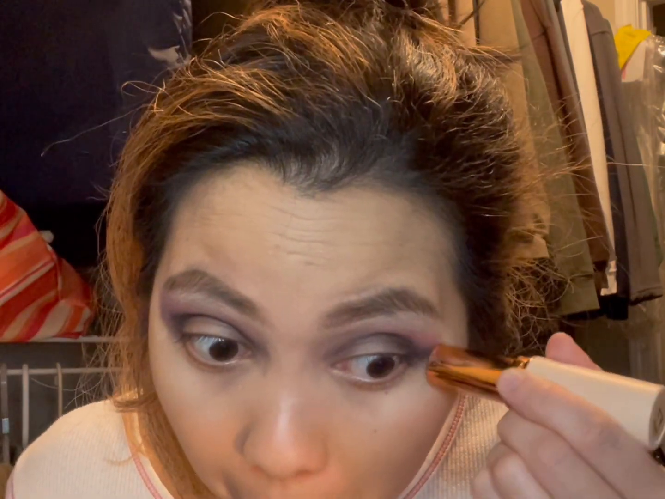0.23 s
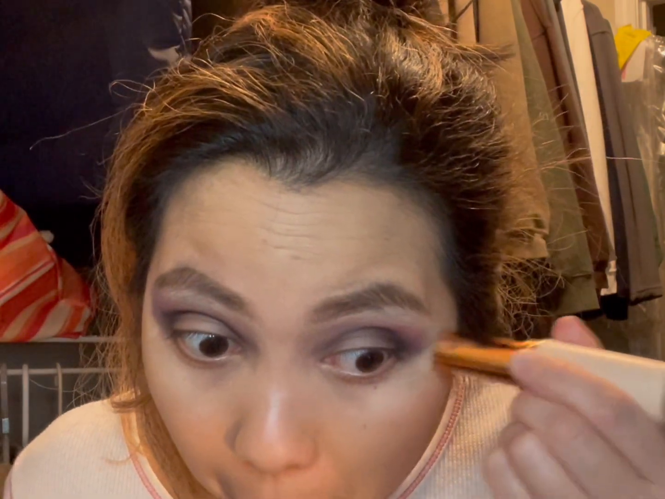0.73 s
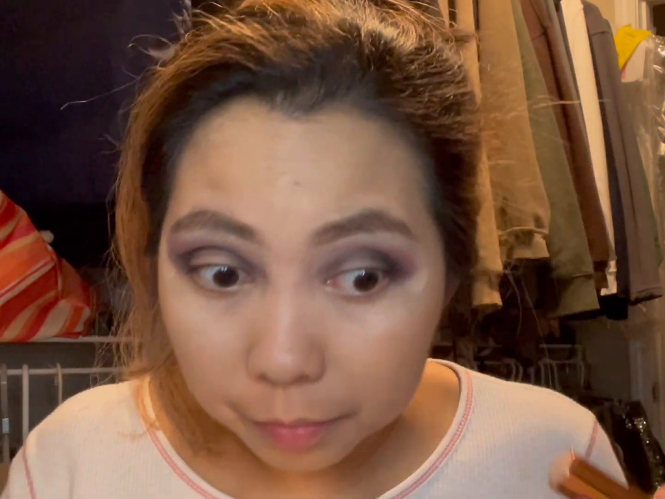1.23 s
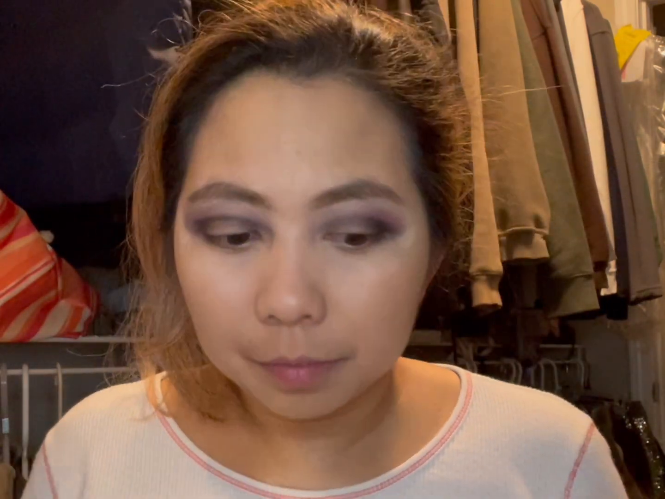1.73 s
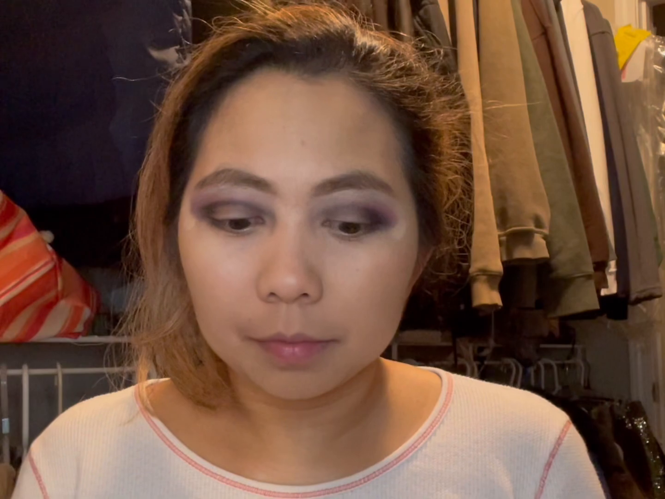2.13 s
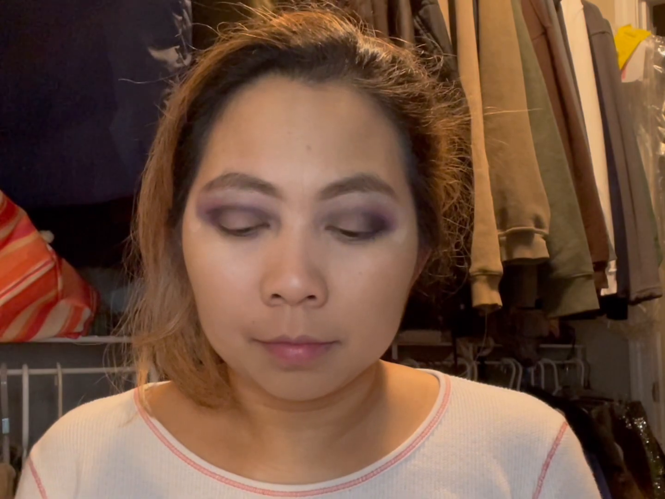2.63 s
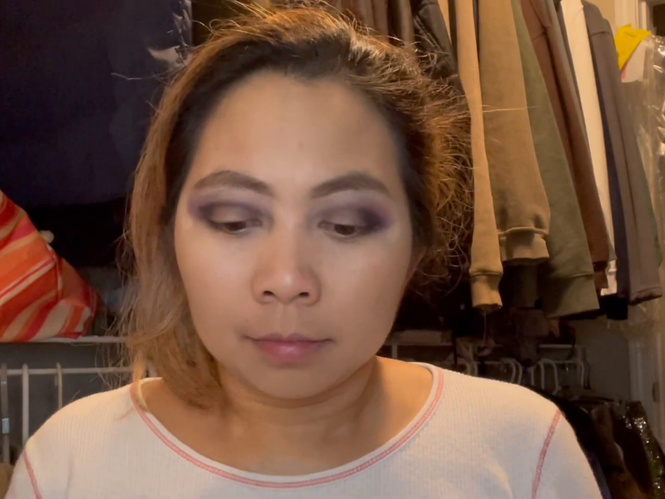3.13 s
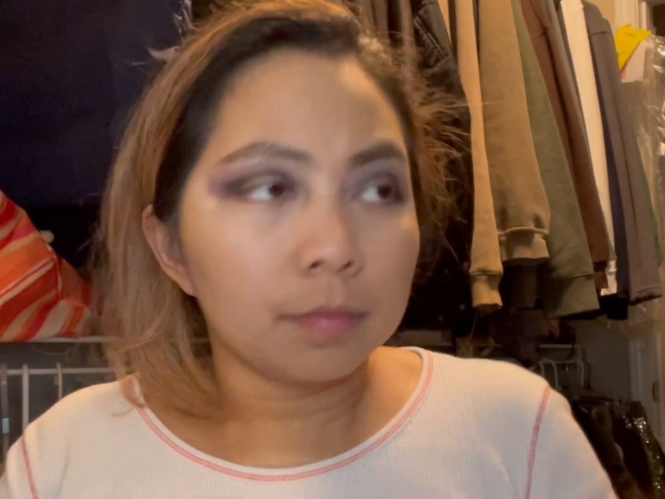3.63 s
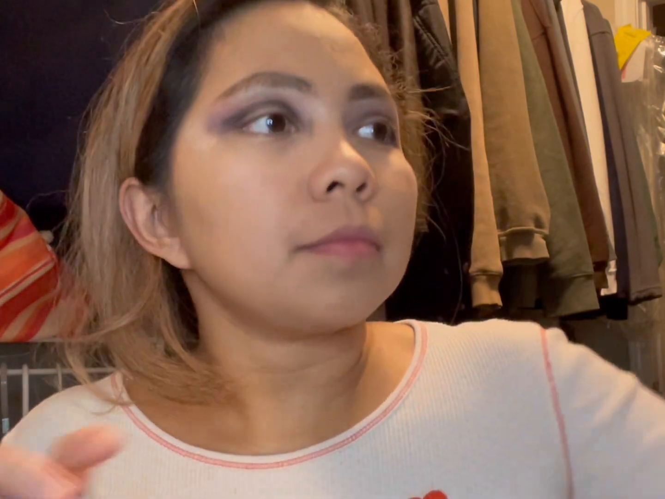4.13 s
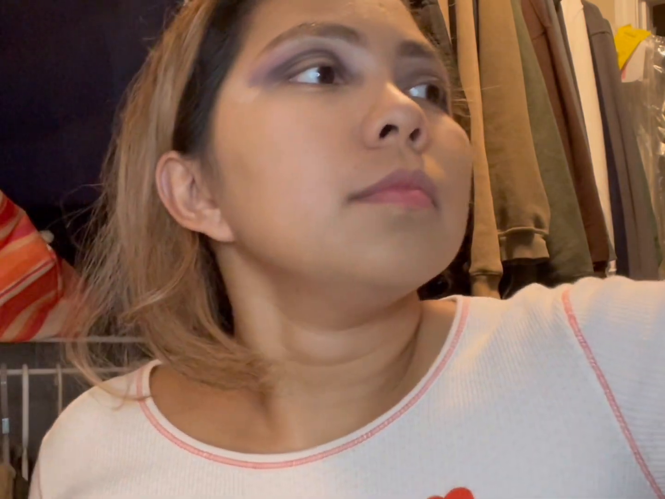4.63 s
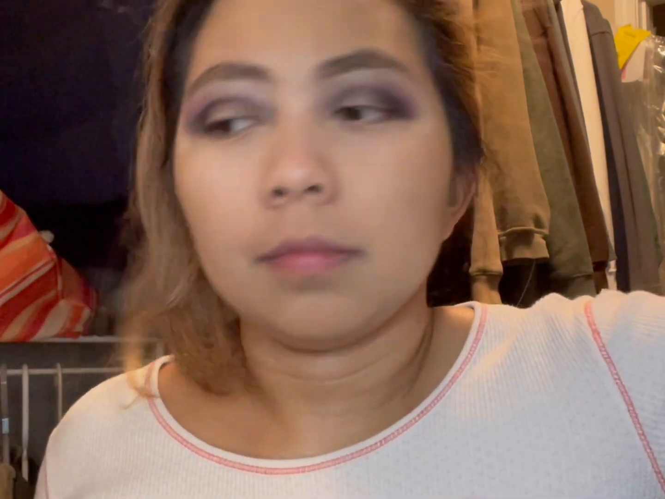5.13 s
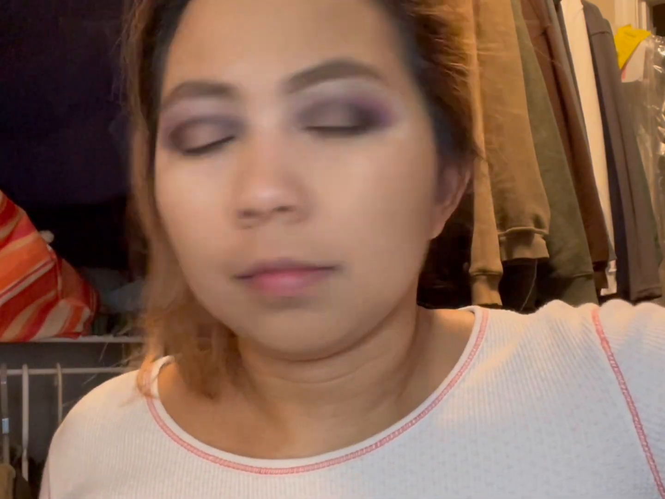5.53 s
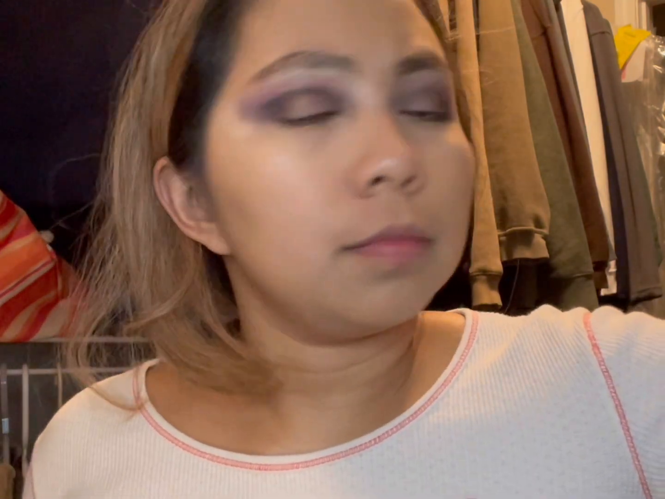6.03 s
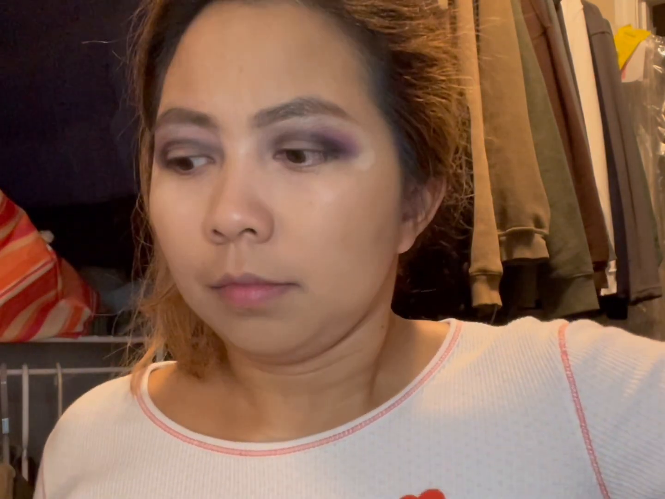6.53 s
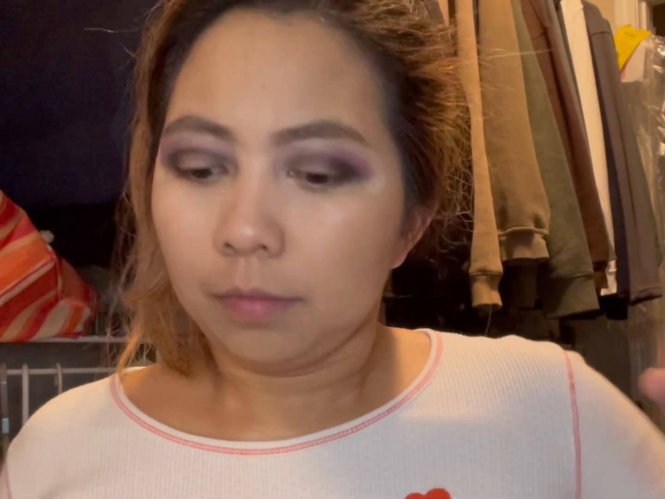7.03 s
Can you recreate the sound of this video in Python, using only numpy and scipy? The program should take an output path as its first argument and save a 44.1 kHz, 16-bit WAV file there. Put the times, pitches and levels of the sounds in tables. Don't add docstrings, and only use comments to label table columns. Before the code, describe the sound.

Close up, faint finger rubs and small plastic ticks, a cap snapping shut twice, then jars knocking and rattling down on a wooden shelf.

```python
import sys
import numpy as np
from scipy import signal
from scipy.fft import rfft, irfft, next_fast_len
from scipy.io import wavfile
from scipy.ndimage import uniform_filter1d

SR = 44100
rng = np.random.default_rng(int(sys.argv[2]) if len(sys.argv) > 2 else 0)


def log_audio(samples):
    frames = np.atleast_2d(samples).T
    limited = np.clip(frames, -1, 1)
    pcm = np.round(limited * 32767).astype(np.int16)
    wavfile.write(sys.argv[1], SR, pcm)


def convert_level_to_amplitude(level_db):
    exponent = np.asarray(level_db, float) / 20
    return 10 ** exponent


N = 320607

# f/Hz, level/dB, t60/s
SHELF_MODES = [(270, 3.5, 0.041), (405, 1, 0.077), (524.3, -3, 0.075), (593, 0.5, 0.035), (685.3, -2, .065)]
# f/Hz, density/dB per Hz
CLATTER_SPECTRUM = [(410, -69.5), (800, -8.5), (1200, -4.5), (2020, -8), (2220, -11), (2560, -13),
                    (4500, -15.5), (5200, -26), (13000, -40.5), (16000, -77)]


def evened(x):
    return x / np.sqrt(np.mean(x ** 2) + 1e-20)


def peaked(x):
    return x / (abs(x).max() + 1e-20)


def read(points, hz):
    f, value = np.transpose(points)
    return np.interp(np.log(hz + 1), np.log(f + 1), value)


def add(mix, s, sound):
    part = mix[..., round(s * SR):][..., :sound.shape[-1]]
    part += sound[..., :part.shape[-1]]


def coloured(x, gain_at):
    size = next_fast_len(x.shape[-1])
    gain = gain_at(np.fft.rfftfreq(size, 1 / SR))
    return irfft(rfft(x, size) * gain, size)[..., :x.shape[-1]]


def highpassed(x, order, hz):
    return signal.sosfilt(signal.butter(order, hz, "high", fs=SR, output="sos"), x)


def ring(modes, contact_ms, rough=0.83, size=6000):
    t = np.arange(2 * size // 3) / SR
    hz, db, t60 = np.transpose(modes)[..., None]
    split = rng.uniform(1.0, 1.04, hz.shape)
    u = 1000 * t / max(contact_ms, .1)
    grit = evened(uniform_filter1d(rng.standard_normal(size), size=24))
    complex_grit = (grit + 1j * grit[::-1])[:len(t)]
    blow = (1 + rough * complex_grit) * (1 - np.exp(-4 * u)) * np.exp(-u)
    decay = convert_level_to_amplitude(-60 / SR / np.maximum(t60[:, 0], .005))
    swell = np.array([signal.lfilter([1], [1, -r], blow) for r in decay])
    start = np.exp(2j * np.pi * 1000 * split)
    pair = np.exp(2j * np.pi * hz * t) + 0.46 * np.exp(2j * np.pi * hz * split * t)
    rung = (swell * start * pair).imag
    rung *= convert_level_to_amplitude(db) / abs(rung).max(axis=1, keepdims=True)
    faded = rung.sum(axis=0) * np.cos(np.pi / 2 * t / t[-1])
    return np.pad(peaked(faded), (0, size - len(t)))


def crack(t60, gain_at, rise_ms=.3, size=6000):
    t = np.arange(size) / SR
    start = 1 - np.exp(-1000 * t / max(rise_ms, .05))
    noise = coloured(rng.standard_normal(size), gain_at)
    return peaked(noise * start * convert_level_to_amplitude(-60 * t / max(t60, .002)))


def bright(hz):
    return 1 / (1 + (2500 / (hz + 1)) ** 2)


def around(centre_hz, octaves):
    return lambda hz: np.exp(-.5 * (np.log2((hz + 1) / centre_hz) / octaves) ** 2)


def snick(fizz_db=-18):
    return crack(0.0045, bright, rise_ms=0.53) + convert_level_to_amplitude(fizz_db) * crack(0.19, bright)


def patchy(depth_db):
    z = signal.stft(rng.standard_normal(N), nperseg=256)[2]
    patches = uniform_filter1d(rng.standard_normal(z.shape), size=6, axis=0)
    patches = uniform_filter1d(patches, size=22, axis=1)
    return signal.istft(z * convert_level_to_amplitude(depth_db * evened(patches)), nperseg=256)[1][:N]


def strokes(rows):
    gains = np.zeros((2, N))
    for s, length, share, db, second_db in rows:
        progress = np.arange(0, length, 1 / SR) / length
        turn = np.interp(progress, [0, np.clip(share, .03, .97), 1], [0, .5, 1])
        add(gains, s, convert_level_to_amplitude(np.array([[db], [db + second_db]])) * abs(np.sin(np.pi * turn)) ** 3.2)
    return gains


def snaps():
    # t/s, peak/dB, crack/dB, scrape before it/dB, body noise/dB
    snap_rows = [
        (3.3138, -11.5, -20.5, -37.5, -32),
        (3.4177, -13, -13.5, -28.5, -20.5),
    ]
    # f/Hz, level/dB, t60/s
    snap_modes = [
        [(429.5, -34.5, .03), (660, -34, .03), (1147, 0, .03), (1040, -16.5, .03), (1553, -19.5, .04),
         (2720, -15.5, 0.024), (1266.6, -19.5, 0.024), (1670, -17.5, 0.028), (2580, -13, 0.028),
         (4150, -22, 0.016), (8900, -17, 0.01)],
        [(274, -14.5, 0.046), (600, -17.5, 0.03), (1080, -5, 0.012), (1674, -0.5, 0.031), (1890, -3, .06),
         (2155, -6, 0.11), (2590, 2.5, .025), (3760, -9.5, 0.027), (4550, -1, 0.029), (8560, -8, 0.016)],
    ]
    snap_low_hz = [300, 170.9]
    contacts_ms = (.9, .43)
    out = np.zeros(N)
    for row, modes, low_hz, contact_ms in zip(snap_rows, snap_modes, snap_low_hz, contacts_ms):
        s, db, crack_db, scrape_db, body_db = row
        scrape = crack(0.013, around(4200, 1.0), size=441)[::-1]
        snap = convert_level_to_amplitude(db) * ring(modes, contact_ms, rough=.25) + convert_level_to_amplitude(crack_db) * snick(fizz_db=-26.5)
        snap = snap + convert_level_to_amplitude(body_db) * crack(0.058, around(2200, 0.71))
        whole = np.concatenate([convert_level_to_amplitude(scrape_db) * scrape, snap])
        add(out, s - .01, highpassed(whole, 8, low_hz))
    return out


def ticks():
    # t/s, peak/dB, main ring f/Hz, crack above ring/dB, dull body above ring/dB
    tick_rows = [(1.077, -84, 2600, 17, 18), (1.159, -78, 1240, 5, -8), (1.46, -72, 1840, -18, -2),
                 (1.716, -47.5, 2300, 17, -1), (1.7175, -49, 1630, -19, 4), (2.615, -44, 1670, 6, -12),
                 (2.674, -46.5, 1618, -19, -31), (2.831, -64, 2720, -4.5, 0), (3.522, -60.5, 1593, -3, -3),
                 (3.58, -65.5, 1633, -1, 0), (3.867, -72.5, 3660, -5, 8), (4.043, -54.5, 3600, -17, -3),
                 (4.045, -61, 1200, -23, -8), (4.212, -53, 2800, -25, -12), (4.2125, -58, 1960, -19, 2),
                 (4.064, -64, 3510, -25, -14), (4.402, -80, 2300, -10, 7), (4.355, -67.5, 1240, -23, 8.5),
                 (4.666, -66.5, 2273, -1.5, -20), (6.289, -65, 1050, 4, -10), (6.268, -62, 3060, 11, -11),
                 (6.288, -68, 3050, 0, -10), (3.388, -70, 1092, -21, 11.5), (5.229, -63, 1684, -26, -12),
                 (6.915, -64.5, 2020, -24.5, -14.5), (6.966, -68, 2000, -25, -16.5)]
    # t/s, peak/dB, f/Hz, crack/dB, dull body/dB
    ratchet_rows = [
        (3.1145, -43.5, 1544, 3, -8),
        (3.1335, -41.5, 1460, 2.5, -6.5),
        (3.1505, -35.5, 1180, 3.5, -13.5),
        (3.175, -47.5, 1140, 1.5, -5),
        (3.28, -49, 1040, 7.5, 0),
        (3.41, -40.5, 555, 6.5, 2),
        (3.414, -30.5, 900, 8.5, -3.5),
    ]
    # multiple of main ring [1], level/dB
    overtones = [(1.001, -3.5), (2.45, -14)]
    kinds = (tick_rows, .3, -24, .04, -18), (ratchet_rows, 1.1, -16, .02, -33)
    out = np.zeros(N)
    for rows, octaves, barrel_db, t60, fizz_db in kinds:
        for s, db, hz, crack_db, dull_db in rows:
            modes = [(hz * k, d, t60 / k) for k, d in overtones] + [(660, barrel_db, .03)]
            body = ring(modes, 1, rough=25 * t60)
            dull = crack(t60, around(1.05 * hz, octaves), rise_ms=.8)
            tick = convert_level_to_amplitude(db) * (body + convert_level_to_amplitude(dull_db) * dull + convert_level_to_amplitude(crack_db) * snick(fizz_db))
            add(out, s, highpassed(tick, 2, hz * 2 ** (-2 * octaves) / 1.1))
    return out


def rubbing():
    # start t/s, length/s, fastest at share [0-1], fine hiss/dB, coarse above fine/dB
    rub_rows = [(.29, .07, 0.5, -99, -2), (.79, 0.1, 0.3, -86.5, 0.5), (1.145, 0.041, 0.3, -79, -9),
                (1.3, 0.094, 0.4, -76.5, -9), (1.385, 0.2, 0.31, -79, -6), (1.555, 0.18, 0.38, -70.5, -1.5),
                (1.71, 0.061, 0.76, -66, -5), (1.8, 0.29, 0.1, -90.5, -3), (2.02, 0.066, 0.7, -83.5, 3.5),
                (2.2, 0.28, 0.46, -83.5, -0.5), (2.5, 0.32, 0.15, -70, -4.5), (2.86, 0.16, 0.2, -83, -10),
                (2.95, 0.15, 0.1, -79, -14), (3.545, 0.18, 0.23, -66.5, -5), (3.84, 0.13, 0.3, -72.5, -5),
                (4.03, 0.13, 0.04, -72, -3.5), (4.205, 0.055, 0, -74.5, -11), (4.27, 0.24, 0.07, -81.5, -7),
                (4.395, 0.22, 0.23, -73, -12), (4.68, 0.15, 0.52, -72.5, -3.5),
                (6.26, 0.11, 0.08, -77.5, 11.5), (7.04, 0.19, 0.34, -74, -10.5),
                (7.14, 0.24, 0.33, -77, -12)]
    # start t/s, length/s, fastest at share [0-1], low resonance/dB, high above low/dB
    twist_rows = [(1.06, 0.65, 0.15, -81.5, -1.5), (1.4, 0.087, 0.95, -82, -5),
                  (1.7, 0.026, 0.79, -59.5, 2), (1.715, 0.065, 0.5, -68, -10), (1.76, 0.07, 0.4, -78, -7),
                  (2.598, 0.027, 0.62, -69.5, -8), (3.11, 0.083, 0.34, -57.5, -12),
                  (1.82, 0.15, 0.2, -94, 3), (2.18, 0.29, 0.45, -96, 12.5), (2.62, 0.18, 0.53, -84.5, 1),
                  (2.69, 0.32, 0.3, -79, 2.5), (3.45, 0.19, 0.23, -77, -2), (3.54, 0.18, 0.43, -88, 13.5),
                  (3.855, 0.13, 0, -87.5, 7.5), (4.045, 0.079, 0, -94, 16.5),
                  (4.215, 0.18, 0.22, -93, 10.5), (4.31, 0.22, 0.12, -79.5, -5),
                  (6.085, 0.15, 0.59, -77, 0.5), (6.265, 0.3, 0.06, -64, -6.5),
                  (7.12, 0.41, 0.26, -74.5, 2.5), (4.12, 0.14, 0.48, -87, 0)]
    # f/Hz, density/dB per Hz
    skin_spectrum = [(4880, 26), (5600, 4.5), (9000, -15.5), (13000, -22), (15900, -20.5), (16500, -31)]
    # f/Hz, width/Hz, level/dB
    tube_modes = [(1250, 400, -8), (1600, 140, 0), (2190, 100, -4), (2700, 110, 2), (3000, 300, -7),
                  (4050, 300, -6)]

    def skin(hz):
        return convert_level_to_amplitude(read(skin_spectrum, hz))

    def upper(hz):
        return 1 / (1 + (9300 / (hz + 1)) ** 12)

    def lower(hz):
        ridge = 1 + 1.6 / (1 + ((hz - 8300) / 350) ** 2)
        return skin(hz) * ridge * (1 - upper(hz)) / (1 + (5700 / (hz + 1)) ** 24)

    def hollow(hz):
        return sum(convert_level_to_amplitude(db) / (1 + (2 * (hz - f) / w) ** 2) ** 0.49 for f, w, db in tube_modes)

    fine = coloured(patchy(2.7), lambda hz: skin(hz) * upper(hz))
    coarse = coloured(patchy(3.2), lower)
    low = coloured(patchy(0.86), lambda hz: hollow(hz) / (1 + (hz / 2300) ** 10))
    high = coloured(patchy(2.8), lambda hz: hollow(hz) / (1 + (2300 / (hz + 1)) ** 10))
    hiss = strokes(rub_rows) * [evened(fine), evened(coarse)]
    whisper = strokes(twist_rows) * [evened(low), evened(high)]
    return (hiss + whisper).sum(axis=0)


def squeaks():
    squeak_rows = [(1.249, 0.28, -87, 2720, 120), (1.37, 0.15, -82.5, 8400, 800),
                   (1.537, .18, -78.5, 8240, 800), (1.823, 0.15, -84, 2720, 120),
                   (2.006, 0.44, -89, 2720, 220), (2.218, 0.18, -88, 8000, 600),
                   (2.721, 0.14, -75.5, 2780, 300), (2.728, 0.12, -84, 5730, 500),
                   (2.85, 0.18, -88, 1520, 150), (3.555, 0.16, -84, 2700, 150),
                   (4.239, 0.074, -84, 1955, 120), (7.13, 0.22, -76, 1570, 150),
                   (7.149, 0.15, -76, 3900, 250), (7.2, 0.089, -82.5, 5400, 600),
                   (7.2, 0.11, -77, 2464, 120), (7.101, 0.062, -83, 2880, 500)]
    out = np.zeros(N)
    for s, length, db, hz, width in squeak_rows:
        air = rng.standard_normal(SR // 2)
        tone = evened(coloured(air, lambda f: 1 / (1 + (2 * (f - hz) / width) ** 2)))
        tone = tone[:round(length * SR)]
        add(out, s, convert_level_to_amplitude(db) * tone * np.sin(np.linspace(0, np.pi, len(tone))))
    return out


def slams():
    # t/s, peak/dB, contact/ms, clatter above ring/dB
    slam_rows = [
        (4.993, -21, 2.3, -12.5),
        (5.0105, -22.5, 0.81, -14.5),
        (6.3345, -12.5, 5.5, -9),
        (6.353, -23, 0.8, -26),
    ]
    # f/Hz, level/dB, t60/s
    slam_modes = [
        [(270, -3, 0.12), (385.8, 1, 0.15), (537, -19, 0.047), (619, 2, 0.046), (890, 0, 0.044),
         (1008, 0.5, 0.061), (1370, -12, 0.051), (1600, -11, 0.056), (1730, -6, 0.041), (1960, -2, 0.036),
         (2300, -16, 0.047), (2700, -16, 0.085), (3540, -24, 0.053), (4340, -18.5, 0.057)],
        [(273.5, 1, 0.089), (400, 1, 0.045), (507.3, 0, 0.076), (652.7, 5, 0.035), (900, 0, 0.03),
         (967, -1, 0.047), (1091, -9.5, 0.035), (2940, -8.5, .04), (1588, -12.5, 0.05), (1704, -17, .04),
         (1987, 4.5, 0.03), (2528, -7.5, 0.087), (3620, -9.5, 0.042), (5230, -14, .02)],
    ]
    out = np.zeros(N)
    for k, (s, db, contact_ms, clatter_db) in enumerate(slam_rows):
        jar = k // 2
        clatter = crack(0.099, lambda hz: convert_level_to_amplitude(read(CLATTER_SPECTRUM, hz)), rise_ms=0.24)
        slam = ring(slam_modes[jar], contact_ms, rough=1.0) + convert_level_to_amplitude(clatter_db) * clatter
        slam = slam + convert_level_to_amplitude((-38, -29)[jar]) * crack(0.13, bright)
        add(out, s, convert_level_to_amplitude(db) * peaked(slam))
    return highpassed(out, 4, 215)


def knocks(rows, tones):
    # f/Hz, level/dB, t60/s
    jar_modes = [(898, -1.5, 0.015), (1067.6, 2, 0.015), (1326, -1.5, 0.055), (1647, -4, 0.03),
                 (1976, 1, 0.016), (2623, -14, 0.0341), (3060, -13, 0.034), (4510, -13.5, 0.017)]
    board_filter = signal.butter(4, 850, fs=SR, output="sos")
    out = np.zeros(N)
    for (s, db, thud_db, contact_ms, tilt_db), struck_hz in zip(rows, tones):
        def tilt(hz):
            return tilt_db * np.log2(hz / 1500 + 0.0045)

        def reach(hz):
            return -17 * abs(np.log2(hz / struck_hz))

        modes = [(hz, d + tilt(hz) + rng.normal(0, 3), t60) for hz, d, t60 in jar_modes]
        jars = ring(modes, .4 * contact_ms, rough=1.2)
        rattle = crack(0.009 * contact_ms, lambda hz: convert_level_to_amplitude(read(CLATTER_SPECTRUM, hz) + tilt(hz)), rise_ms=0.18)
        tick = convert_level_to_amplitude(-32 + tilt_db - .8 * thud_db) * crack(.03, bright)
        modes = [(hz, d + reach(hz) + rng.normal(0, 1), t60) for hz, d, t60 in SHELF_MODES]
        board = signal.sosfilt(board_filter, ring(modes, 0.71 * contact_ms, rough=1.0))
        add(out, s, convert_level_to_amplitude(db) * (convert_level_to_amplitude(thud_db) * board + peaked(jars + convert_level_to_amplitude(0.5) * rattle + tick)))
    return highpassed(out, 6, 215)


def shelf():
    # t/s, clatter peak/dB, thud above clatter/dB,
    # contact/ms, brightness/dB per octave
    knock_rows = [(4.664, -71.5, 13.5, 2.6, 15), (4.778, -61.5, 3, 14, 5), (4.831, -49, 9, 9.1, -0.5),
                  (4.946, -53.5, 9.5, 9.1, -1.5), (4.964, -52, 11.5, 100, -4.5), (4.987, -47, -6, 2.6, -6),
                  (5.031, -39.5, 5, 4.6, -12), (5.06, -42, 6.5, 5, -6), (5.124, -60, 5, 6.9, -30),
                  (5.198, -51.5, 9, 7, -2.5), (5.235, -62.5, 12, 1.8, -17), (5.3235, -45.5, 8.5, 5.6, -0.5),
                  (5.353, -53, 0, 5.9, -5), (5.392, -61.5, 9, 6.5, -6.5),
                  (6.094, -61, -0.5, 17, 4), (6.269, -55, 9, 26, 7), (6.329, -45, -3, 3, -2),
                   (6.37, -43, -10.5, 17.5, -4.5), (6.54, -59.5, 0, 11, -1.5), (6.662, -58, 9.5, 7, -1.5),
                   (6.744, -63, 19.5, 4.8, -12), (7.059, -74, 17.5, 4.7, 1), (6.518, -63, 15, 9.6, 4.5),
                   (6.561, -36.5, -3.5, 8.3, 1.5), (6.589, -33, -5.5, 6.8, -6),
                   (6.645, -40, -4.5, 8.7, -10), (6.687, -44.5, 3, 4.2, -11.5), (6.724, -58.5, 12, 11, -9),
                   (6.773, -58.5, 11, 11, -4.5), (6.797, -52, 9.5, 11.3, 0), (6.864, -55, 12.5, 9.3, -6.5),
                   (6.915, -62.5, 16, 9.4, -1), (6.962, -69.5, 18.5, 9.8, 2), (7.013, -69, 18, 17, 0)]
    favoured_hz = [260, 445, 405, 276, 270, 450, 300, 331, 660, 323, 276, 334, 327, 265, 300, 471, 448, 293,
                   400, 292, 405, 390, 310, 476, 470, 352, 444, 540, 540, 282, 383, 280, 289, 300]
    # start t/s, length/s, fastest at share [0-1], frame boom/dB, board rumble above boom/dB
    drag_rows = [(2.68, 0.34, 0.45, -70, -7), (4.63, 0.14, 0.72, -59.5, -35), (4.8, 0.14, 0.32, -59.5, -23),
                 (4.94, 0.2, 0.34, -51.5, 5), (5.14, .2, 0.4, -57.5, -10), (5.36, 0.091, 0.55, -59.5, -11),
                 (6.26, 0.43, 0.19, -61.5, -8.5), (6.52, 0.18, 0.31, -63.5, 7.5),
                 (6.63, 0.29, 0.12, -64.5, 8.5), (6.76, 0.076, 0.9, -58.5, -2),
                 (6.83, 0.17, 0.27, -66, 5.5), (6.97, 0.36, 0, -64.5, -5.5), (7.14, 0.18, 0.62, -68.5, 0)]

    def board(hz):
        return sum(convert_level_to_amplitude(d - 10.5 * np.log2(f / 400)) / (1 + ((hz - f) * t60 / 2.3) ** 2)
                   for f, d, t60 in SHELF_MODES)

    struck = knocks(knock_rows, favoured_hz)
    low, drag, slips = rng.standard_normal((3, N))
    boom = coloured(low, lambda hz: 1 / (1 + ((hz - 105) / 40) ** 4))
    unevenness = np.clip(evened(uniform_filter1d(slips, size=500)), -3, 1.5)
    rumble = coloured(drag * convert_level_to_amplitude(4.5 * unevenness), board)
    return struck + (strokes(drag_rows) * [evened(boom), evened(rumble)]).sum(axis=0)


def late_knocks():
    # t/s, clatter peak/dB, thud above clatter/dB, contact/ms, brightness/dB per octave
    late_knock_rows = [
        (6.73, -56.5, 5.6, 4, -6),
        (6.833, -69, 12, 3.5, -6),
        (6.898, -65, 6.1, 3.3, 2),
        (6.94, -69, 8, 4.3, 6),
        (6.996, -75, 6.7, 4, 0),
    ]
    late_knock_tones_hz = [550, 550, 554, 400, 576]
    return knocks(late_knock_rows, late_knock_tones_hz)


def bumps():
    # t/s, peak/dB, f/Hz, t60/s
    bump_rows = [
        (3.42, -57.5, 140.2, .08),
        (4.671, -56, 72.5, 0.18),
        (4.83, -52, 74.5, .15),
        (5.001, -47.5, 184, 0.092),
        (5.329, -59, 186, 0.065),
        (3.46, -55.5, 74.8, .2),
        (6.363, -57, 79, 0.15),
        (6.96, -56.5, 70, 0.42),
    ]
    out = np.zeros(N)
    for s, db, hz, t60 in bump_rows:
        add(out, s, convert_level_to_amplitude(db) * ring([(hz, 0, t60)], 6.7, rough=0.34, size=13500))
    return out


def ports(x, phase, balance):
    def pair(hz):
        half = convert_level_to_amplitude(read(balance, hz) / 2) * np.exp(.5j * read(phase, hz))
        return np.array([half, 1 / half]) / np.maximum(abs(half + 1 / half) / 2, .5)
    return coloured(x, pair)


def closet(x):
    # f/Hz, t60/s
    closet_t60 = [(200, 0.25), (1000, 0.085), (3000, 0.14), (8000, 0.1), (16000, 0.06)]
    taps = np.zeros((2, SR // 2))
    at = np.arange(200, SR // 2 - 20, 20)
    at = at + rng.integers(0, 20, (2, (SR // 2 - 201) // 20))
    np.put_along_axis(taps, at, rng.choice([-1., 1.], at.shape), 1)
    hz, t, z = signal.stft(taps, SR, nperseg=256)
    tail = signal.istft(z * convert_level_to_amplitude(-60 * t / read(closet_t60, hz)[:, None]), SR, nperseg=256)[1]
    tail[1] = 0.4 * tail[0] + 1.1 * tail[1]
    return signal.fftconvolve(x[None], tail / np.linalg.norm(tail[0]), axes=1)[:, :N]


def background():
    # f/Hz, level/dB rms, start phase/turns
    hum_lines = [(52.79, -65.8, .47), (59.28, -67, .91), (119.99, -74.5, .52)]
    # t/s, f/Hz, level/dB rms
    engine_path = [(0, 95, -80), (.2, 91.3, -69.5), (.6, 83.9, -77.5), (1.55, 83, -72), (1.9, 82, -100)]
    # f/Hz, density/dB per Hz
    air_spectrum = [(20, -19.5), (44, -7.5), (66, -9), (82, -12), (124, -17), (147, -21.5), (258, -27.5),
                    (372, -34.5), (690, -39), (794, -43), (2060, -44), (3830, -47.5), (16500, -61.5)]
    # f/Hz, level/dB
    capsule_shape = [(4300, -2.1), (4900, -1), (5600, -6), (7000, -5.5), (10000, 1.5), (13600, 0),
                     (14600, -8.5), (16000, -11.5)]
    # f/Hz, left-right likeness [-1 to 1]
    air_likeness = [(60, 0.85), (130, 0.88), (290, 0.3), (640, 0.2), (1410, 0.47), (3100, 0.03),
                    (6820, 0.93), (15000, 0.68)]
    air_db = -67.5

    def density(hz):
        return convert_level_to_amplitude(read(air_spectrum, hz) + read(capsule_shape, hz))

    def side_density(hz):
        same = np.clip(read(air_likeness, hz), -.9, .999)
        return density(hz) * np.sqrt((1 - same) / (1 + same))

    t = np.arange(N) / SR
    waver = uniform_filter1d(rng.standard_normal((3, N)), size=9000)
    waver = evened(uniform_filter1d(waver, size=9000))
    hum = np.zeros(N)
    for (hz, db, turns), w in zip(hum_lines, waver):
        hum += np.sqrt(2) * convert_level_to_amplitude(db + 0.5 * w) * np.sin(2 * np.pi * (hz * t + turns))
    s, pitch_hz, engine_db = np.transpose(engine_path)
    engine_turns = np.cumsum(np.interp(t, s, pitch_hz)) / SR
    hum += np.sqrt(2) * convert_level_to_amplitude(np.interp(t, s, engine_db)) * np.sin(2 * np.pi * engine_turns)
    one, other = rng.standard_normal((2, N))
    mid, side = coloured(one, density), coloured(other, side_density)
    return hum + convert_level_to_amplitude(air_db) * np.array([mid + side, mid - side]) / np.std(mid)


def scene():
    # f/Hz, left lead/rad
    hands_phase = [(0, -0.5), (900, 2), (1140, 1), (1550, 1.87), (2600, 0.82), (6200, 3.5), (9000, 1.3),
                   (16500, 1)]
    cap_phase = [(0, 0.5), (1030, 0.2), (1550, 5.5), (1810, 8.5), (2760, 7.5), (3100, 9.5), (4050, 5.5),
                 (4740, 10.5), (5250, 10), (5680, 12), (6030, 11), (6370, 10.5), (12100, 11.5), (16500, 12)]
    shelf_phase = [(0, 0), (690, 0.3), (1460, -4.7), (2070, -5.9), (2840, -3.7), (3360, -7.2), (3620, -6.1),
                   (4390, -9.7), (5340, -9.3), (6200, -8.5), (7060, -8.6), (11800, -6.3), (15800, -6.3),
                   (16500, -7.4)]
    # f/Hz, L-R level/dB
    hands_balance = [(60, -2.5), (330, 0), (500, -0.5), (800, 2), (2740, 1.5), (6400, 4), (15000, -2.5)]
    cap_balance = [(60, 0.0), (110, 0.5), (200, 0.5), (380, -1), (700, 3.5), (1290, 6.5), (2380, 3),
                   (4400, 2.5), (8120, 0.5), (15000, 2.5)]
    shelf_balance = [(60, 1), (290, 0.5), (640, -7), (1410, -6.5), (3100, -1.5), (15000, -19)]
    shut = highpassed(snaps(), 2, 150)
    cap = highpassed(ticks(), 2, 150)
    wood = shelf()
    room = closet(convert_level_to_amplitude(-8) * cap + convert_level_to_amplitude(-14.5) * shut + convert_level_to_amplitude(-7.5) * wood) + background() + bumps()
    hands = ports(cap + rubbing() + squeaks(), hands_phase, hands_balance)
    snapped = ports(shut, cap_phase, cap_balance)
    right = ports(wood + slams() + late_knocks(), shelf_phase, shelf_balance)
    return hands + snapped + right + room


def band_limit(x):
    return signal.sosfilt(signal.butter(12, 16840, fs=SR, output="sos"), x)


def record(dry):
    edge_hz, dip_hz = 16300, 4930

    def band(hz):
        dip = 1 - .9 / (1 + ((hz - dip_hz) / 90) ** 2)
        return np.clip((edge_hz - hz) / 500, 0, 1) / np.sqrt(1 + (42 / (hz + 1)) ** 6) * dip

    mid, side = (dry[0] + dry[1]) / 2, (dry[0] - dry[1]) / 2
    side = coloured(side, lambda hz: 1 / np.sqrt(1 + (hz / 10000) ** 5 + (130 / (hz + 1)) ** 4))
    mix = coloured(np.array([mid + side, mid - side]), band)
    return band_limit(mix)


dry = scene()
out = record(dry)
log_audio(out)
```